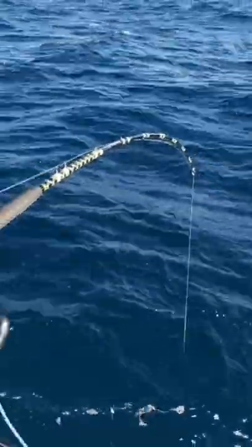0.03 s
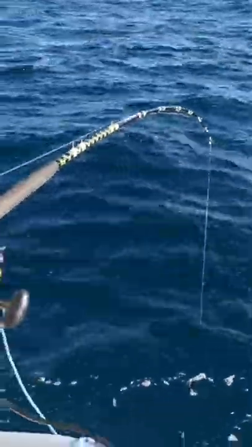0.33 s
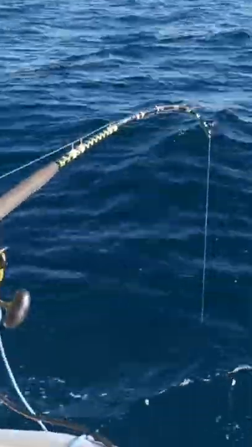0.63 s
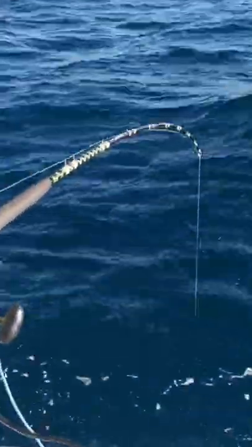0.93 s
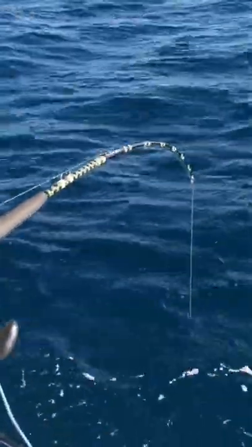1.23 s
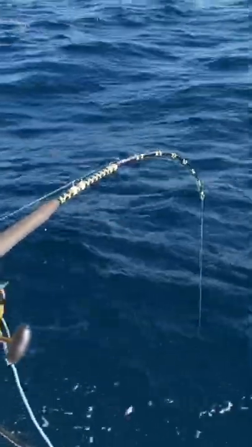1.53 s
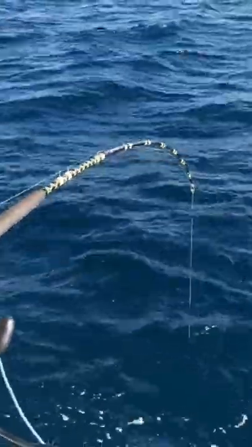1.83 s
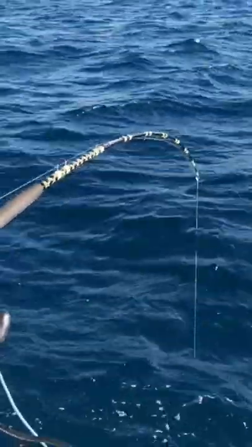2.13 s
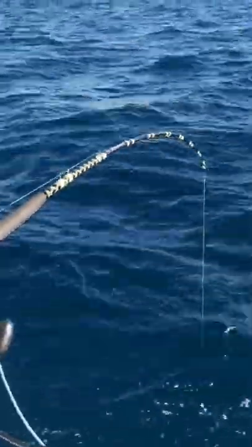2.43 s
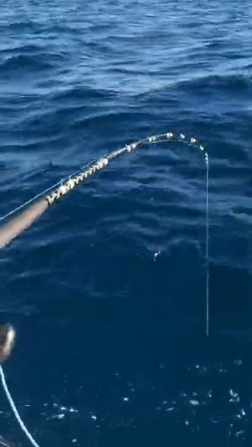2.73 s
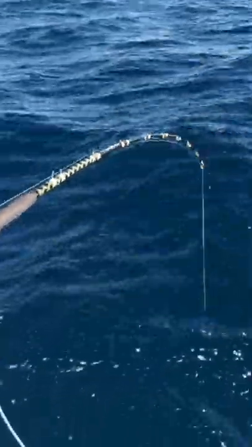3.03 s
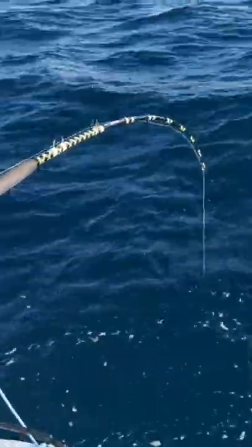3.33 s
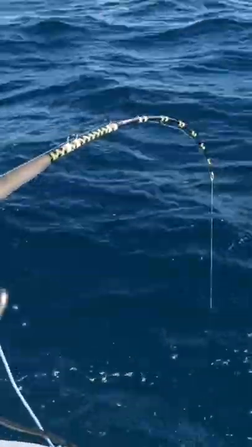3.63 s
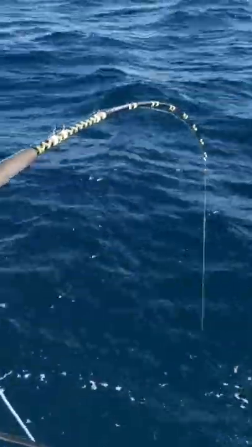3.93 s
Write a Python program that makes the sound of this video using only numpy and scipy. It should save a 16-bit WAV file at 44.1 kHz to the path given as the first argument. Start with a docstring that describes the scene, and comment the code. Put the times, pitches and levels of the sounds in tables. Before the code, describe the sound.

Close, wavering gear whine of an electric fishing reel, with wind gusts over faint sea wash.

```python
"""On a boat at sea, an electric fishing reel winds in line close to the microphone.
Meshing teeth make its gears whine, and sliding teeth rasp through the resonant housing;
the pitch sinks as the gears slow each time the swell loads the rod.
Gusts of wind buffet the microphone with turbulent pressure, mostly on the left,
over a faint wash of water."""
import sys
import numpy as np
from scipy import signal
from scipy.fft import rfft, irfft
from scipy.io import wavfile
from scipy.ndimage import uniform_filter1d, minimum_filter1d

SR = 44100
rng = np.random.default_rng(int(sys.argv[2]) if len(sys.argv) > 2 else 0)


def generate_wav(signal):
    """Clip the signal to [-1, 1] and save it as 16-bit WAV at the path in sys.argv[1]."""
    frames = np.transpose(np.atleast_2d(signal))
    scaled = np.clip(frames, -1, 1) * 32767
    pcm = np.round(scaled).astype(np.int16)
    wavfile.write(sys.argv[1], SR, pcm)


N = 176400
TIME = np.arange(N) / SR
BIN_HZ = np.maximum(np.arange(N // 2 + 1) * SR / N, 1)


def from_db(db):
    """Amplitude grows tenfold for every 20 decibels."""
    return 10 ** (np.asarray(db) / 20)


def unit_rms(x):
    """Normalisation to a mean power of 1."""
    return x / np.sqrt(np.mean(x ** 2) + 1e-20)


def in_time(rows):
    """Linear interpolation of (time_s, value) rows at every sample."""
    return np.interp(TIME, *np.transpose(rows))


def glide(rows):
    """Cubic Hermite interpolation of (time_s, value) rows: the slope stays continuous."""
    times, values = np.transpose(rows)
    slope = np.gradient(values, times)
    i = np.clip(np.searchsorted(times, TIME) - 1, 0, len(times) - 2)
    span, rise = times[i + 1] - times[i], values[i + 1] - values[i]
    u = (TIME - times[i]) / span
    bend = (1 - u) * (slope[i] * span - rise) - u * (slope[i + 1] * span - rise)
    return values[i] + u * rise + u * (1 - u) * bend


def per_bin(rows, column=1):
    """Interpolation of one column of a spectrum over log frequency."""
    columns = np.transpose(rows)
    return np.interp(np.log(BIN_HZ), np.log(columns[0]), columns[column])


def drift(corner_hz, step=20):
    """Low-pass filtered noise: a slow random fluctuation of rms 1."""
    count = N // step
    lowpass = 1 / (1 + (BIN_HZ[:count // 2 + 1] / corner_hz) ** 2)
    slow = irfft(rfft(rng.standard_normal(count)) * lowpass, count)
    return np.interp(np.arange(N) / step, np.arange(count), unit_rms(slow))


def pan(balance_db):
    """Constant-power panning: left and right gains from their level difference."""
    gains = from_db(np.array([balance_db, -balance_db]) / 2)
    return gains / np.sqrt(np.mean(gains ** 2, axis=0))


def stereo_noise(gain_db):
    """Spectral shaping of two uncorrelated white noises."""
    return irfft(rfft(rng.standard_normal((2, N))) * from_db(gain_db), N)


# Spectrum of the water: frequency_hz, relative_db
SEA_SPECTRUM = [(60, -5.5), (200, -7), (500, -18), (1200, -3), (4000, -21), (15000, -52)]


def sea(level_db=-54.5):
    """Stationary noise, uncorrelated between the channels, gives an even wash of water."""
    return from_db(level_db) * unit_rms(stereo_noise(per_bin(SEA_SPECTRUM)))


# Stereo image of the wind: frequency_hz, left_minus_right_db, coherence
WIND_IMAGE = [(30, -1.5, .65), (70, -.5, .55), (160, 5.5, .38), (320, 11.5, .3), (700, 13, .3)]


def turbulence(spectrum, flutter_db, flutter_hz):
    """Turbulent pressure is only partly coherent at two microphones; their average has rms 1."""
    balance_db, coherence = per_bin(WIND_IMAGE), per_bin(WIND_IMAGE, column=2)
    noise = rng.standard_normal((2, N))
    flutter = from_db(flutter_db * np.clip(drift(flutter_hz), -2, 2))
    mid, side = rfft(noise * flutter)
    ports = np.sqrt(1 + coherence) * mid + np.sqrt(1 - coherence) * side * [[1], [-1]]
    pressure = irfft(ports * pan(balance_db) * from_db(per_bin(spectrum)), N)
    return pressure / pressure.mean(axis=0).std()


# Envelopes of the deep rumble and the higher buffeting: time_s, level_db
RUMBLE_ENVELOPE = [(0.0, -29), (0.11, -23), (0.3, -38), (0.32, -31), (0.4, -22), (0.71, -30.5),
                   (0.82, -22.5), (1.02, -23.5), (1.07, -35), (1.14, -28.5), (1.18, -22), (1.34, -28.5),
                   (1.41, -14.5), (1.61, -26.5), (1.67, -20.5), (1.74, -14.5), (1.79, -21), (1.99, -17),
                   (2.02, -20), (2.33, -23), (2.42, -13.5), (2.51, -19.5), (2.6, -11.5), (2.62, -18.5),
                   (2.81, -18.5), (2.84, -18), (3.09, -15.5), (3.13, -21.5), (3.16, -12), (3.23, -17.5),
                   (3.32, -15.5), (3.56, -28.5), (3.6, -18), (3.62, -31), (3.78, -21.5), (3.81, -25.5),
                   (3.98, -22), (4.0, -29)]
BUFFET_ENVELOPE = [(0.0, -36.5), (0.07, -55), (0.09, -24.5), (0.1, -39.5), (0.31, -47.5), (0.47, -26.5),
                   (0.53, -39), (0.61, -31), (0.7, -49), (0.71, -30), (0.81, -44), (0.87, -25), (0.91, -40),
                   (0.93, -26), (1.01, -26.5), (1.05, -42), (1.11, -51), (1.18, -28), (1.21, -56),
                   (1.25, -28), (1.29, -35), (1.31, -45.5), (1.45, -19.5), (1.53, -39), (1.54, -31),
                   (1.67, -28), (1.7, -52), (1.71, -32), (1.77, -28.5), (1.82, -30.5), (1.86, -20),
                   (1.93, -21.5), (1.98, -32), (2.17, -24), (2.19, -41), (2.24, -26), (2.29, -33),
                   (2.37, -28), (2.48, -28.5), (2.61, -24), (2.63, -27), (2.65, -21), (2.83, -29),
                   (2.9, -24.5), (3.1, -25.5), (3.16, -22.5), (3.21, -28.5), (3.41, -27), (3.44, -40),
                   (3.49, -25), (3.63, -46.5), (3.69, -24.5), (3.73, -40.5), (3.83, -43.5), (3.89, -26),
                   (3.92, -38), (3.98, -25), (4.0, -40)]
# Their spectra: frequency_hz, relative_db
RUMBLE_SPECTRUM = [(12, -4), (25, -4.5), (55, -1), (80, -1), (120, -4.5), (200, -11), (350, -24),
                   (800, -90)]
BUFFET_SPECTRUM = [(80, -17), (160, 1), (240, 0.5), (400, -4.5), (600, -10.5), (900, -19.5), (1400, -30.5),
                   (3000, -62)]


def wind(rumble_gain_db=1, buffet_gain_db=1.5):
    """Pressure fluctuations in each gust make a deep rumble and a rougher, higher buffeting."""
    rumble = turbulence(RUMBLE_SPECTRUM, flutter_db=2.5, flutter_hz=15)
    buffet = turbulence(BUFFET_SPECTRUM, flutter_db=3.0, flutter_hz=64)
    return (rumble * from_db(in_time(RUMBLE_ENVELOPE) + rumble_gain_db)
            + buffet * from_db(in_time(BUFFET_ENVELOPE) + buffet_gain_db))


# Single eddies striking the microphone: centre_s, half_width_s, level_db
EDDIES = [(0.464, 0.04, -18.5), (0.841, 0.011, -26), (1.185, 0.022, -18), (1.428, 0.037, -19),
          (1.718, 0.01, -12.5), (1.823, 0.027, -11.5), (1.914, 0.023, -12), (2.173, 0.017, -16),
          (2.607, 0.006, -10), (2.659, 0.025, -15.5), (2.767, 0.021, -13.5), (2.999, 0.018, -14.5),
          (3.374, 0.017, -15.5)]
# Spectrum of an eddy: frequency_hz, relative_db
EDDY_SPECTRUM = [(40, 2.5), (120, 4.5), (300, 0.5), (450, -3.5), (700, -11), (1300, -27), (3000, -54)]


def eddies(gain_db=-3):
    """A passing eddy thumps: a short burst of turbulent pressure under a Gaussian envelope."""
    air = turbulence(EDDY_SPECTRUM, flutter_db=1, flutter_hz=37)
    running_rms = np.sqrt(uniform_filter1d(air.mean(axis=0) ** 2, size=900) + 1e-6)
    envelope = sum(from_db(level_db + gain_db) * np.exp(-2 * ((TIME - centre_s) / half_width_s) ** 2)
                   for centre_s, half_width_s, level_db in EDDIES)
    return air / running_rms * envelope


def throb(turns, depth):
    """Amplitude modulation at twice the shaft's rotation rate."""
    return 1 + depth * np.sin(2 * np.pi * 2 * turns)


def shaft_harmonic(order, turns, roughness, width_hz=71):
    """Uneven tooth contact spreads a shaft harmonic into a narrow band; rms about 1."""
    phase = 2 * np.pi * (round(order) * turns + rng.random())
    in_phase = 1 + roughness * drift(width_hz)
    quadrature = roughness * drift(width_hz)
    return np.sqrt(2) * (in_phase * np.sin(phase) + quadrature * np.cos(phase))


# Rasp that differs between the microphones: frequency_hz, relative_to_shared_hiss_db
INCOHERENT_RASP = [(1000, -7), (2500, -11), (4500, -5), (6000, -9), (8000, -11), (12000, -3)]


def gear_rasp(turns, hiss_db=-16.5, wear_db=-26, wear_points=1024):
    """Sliding friction makes the teeth hiss; their worn pattern repeats on every turn."""
    profile = signal.resample(rng.standard_normal(wear_points), wear_points * 10)
    wear = np.interp(turns % 1, np.arange(len(profile)) / len(profile), profile)
    shared_hiss = from_db(hiss_db) * rng.standard_normal(N)
    incoherent_hiss = stereo_noise(hiss_db + per_bin(INCOHERENT_RASP))
    return (shared_hiss + incoherent_hiss + from_db(wear_db) * wear) * throb(turns, depth=0.04)


# Fainter shaft harmonics, ahead of the resonances: cycles_per_turn, level_db
GEAR_HARMONICS = [(19, -29), (31, -25.5), (60, -37), (62, -33), (64, -38.5), (84, -38.5), (88, -45),
                  (91, -44.5), (95, -37), (108, -44), (115, -42), (117, -37.5), (122, -43.5), (126, -37.5),
                  (157, -39), (187, -44.5), (217, -39.5), (232, -36.5)]
# Resonances of the gear train: centre_hz, bandwidth_hz, gain_db
GEAR_RESONANCES = [(682, 21, 4), (1119, 25, 7.5), (1790, 110, 1), (2210, 155, 7), (2960, 150, -2.5),
                   (3340, 310, 4), (3770, 150, -0.5), (4510, 120, 5), (5440, 260, 5), (6300, 180, 1.5),
                   (7360, 830, 4.5)]
# Level of these tones against the rasp: time_s, gain_db
TONE_ENVELOPE = [(0, 3), (.6, -1.5), (1.2, 0.5), (1.8, 0.5), (2.4, 0), (3.1, 1.5), (4, -1)]


def gear_tones(turns, flutter_db=2.5, flutter_hz=5.3):
    """Forced vibration: faint harmonics change level as they sweep through the gear train's modes."""
    tones = 0
    for order, level_db in GEAR_HARMONICS:
        tone = shaft_harmonic(order, turns, roughness=0.32)
        tones += tone * from_db(level_db + flutter_db * drift(flutter_hz))
    response_db = sum(gain_db / (1 + (2 * (BIN_HZ - centre_hz) / bandwidth_hz) ** 2)
                      for centre_hz, bandwidth_hz, gain_db in GEAR_RESONANCES)
    resonant = irfft(rfft(tones) * from_db(response_db), N)
    return resonant * from_db(in_time(TONE_ENVELOPE)) * throb(turns, depth=0.2)


# Envelopes of the leading whines, named by approximate cycles per turn: time_s, level_db
WHINE_57 = [(0.0, -42.0), (0.18, -37), (0.5, -43), (0.78, -38), (1.24, -47.5), (1.3, -40.5), (1.66, -46),
            (1.78, -52), (1.94, -43.5), (2.2, -51), (2.24, -45), (2.32, -46), (2.38, -44.5), (2.76, -47),
            (3.26, -35.5), (3.46, -48), (3.74, -37.5), (3.98, -38.0)]
WHINE_93 = [(0, -34), (.45, -31), (.62, -30), (.78, -35), (.95, -29), (1.28, -31.5), (1.64, -37.5),
            (2.1, -35.5), (2.3, -37.5), (2.48, -42), (2.63, -43), (2.76, -30.5), (3.02, -48), (3.2, -33.5),
            (3.34, -42), (3.48, -37), (3.64, -36.5), (3.76, -53), (4, -49)]
WHINE_124 = [(0.0, -44), (0.18, -37), (0.3, -45), (0.46, -39), (0.62, -40), (0.78, -36.0), (1.16, -36.0),
             (1.3, -43), (1.86, -32.0), (2.14, -38.5), (2.42, -34.5), (2.66, -41.5), (2.92, -38.5),
             (3.24, -46.0), (3.36, -35), (3.56, -44), (3.62, -37), (3.98, -43)]
WHINE_155 = [(0.0, -50), (0.3, -52), (0.38, -54.0), (0.44, -43), (0.74, -29.5), (1.28, -32.5),
             (1.46, -45.0), (1.62, -40), (1.8, -47), (2.12, -35), (2.24, -50), (2.74, -35), (3.16, -31),
             (3.34, -47.0), (3.54, -39.0), (3.7, -39), (3.84, -58.0), (3.98, -44.0)]
WHINE_174 = [(0, -38), (.1, -33.5), (.54, -30.5), (.74, -47), (1.02, -41), (1.2, -46), (1.34, -33),
             (1.68, -30), (1.84, -34), (1.94, -44), (2.18, -45), (2.4, -34), (2.66, -39), (2.76, -50),
             (3.22, -44), (3.3, -33), (3.62, -45), (4, -46)]
# The leading whines: approximate_cycles_per_turn, envelope, wobble_depth, throb_depth, roughness
LEADING_WHINES = [(93.02, WHINE_93, 0.24, 0.11, 0.23), (123.6, WHINE_124, .05, 0.24, 0.21),
                  (154.8, WHINE_155, 0.18, .4, 0.23), (57, WHINE_57, 0.16, 0.074, 0.28),
                  (174.6, WHINE_174, 0.22, .02, 0.34)]


def whines(turns, gain_db=1, flutter_db=0.7, flutter_hz=5.3):
    """Modulation once and twice a turn puts sidebands on five strong harmonics that swell and fade."""
    out = 0
    for order, envelope, wobble_depth, throb_depth, roughness in LEADING_WHINES:
        level_db = in_time(envelope) + gain_db + flutter_db * drift(flutter_hz)
        modulation = throb(turns, throb_depth) + wobble_depth * np.cos(2 * np.pi * turns)
        out += from_db(level_db) * modulation * shaft_harmonic(order, turns, roughness)
    return out


# Level difference of the reel at the microphones: frequency_hz, left_minus_right_db
LEVEL_DIFFERENCE = [(600, -0.5), (1100, 0), (1600, 6), (1950, -2), (2300, 4), (3100, 2), (3750, 4.5),
                    (4900, 8), (5500, 0), (6200, -1.5), (7000, -1), (8000, -1.5), (14000, 2.5)]
# Phase difference of its direct sound: frequency_hz, left_lead_rad
PHASE_DIFFERENCE = [(300, 0), (1200, .24), (2000, 1), (2670, -.71), (3100, 0), (4400, .86), (4700, .65),
                    (5000, -1.06), (5600, -.65), (6500, -.1), (9000, .1), (14000, -.6)]


def path_to_microphones(scatter_db=-29, decay_s=0.0067):
    """Superposition of direct sound and scatter off the deck gives each side's frequency response."""
    direct = np.exp(np.outer([1j, -1j], per_bin(PHASE_DIFFERENCE) / 2))
    reflections = rng.standard_normal((2, N)) * np.exp(-TIME / decay_s)
    scatter = from_db(scatter_db) * rfft(unit_rms(reflections)) / np.sqrt(N)
    return pan(per_bin(LEVEL_DIFFERENCE)) * (direct + scatter)


# Rate at which the teeth meet, falling under load: time_s, pitch_hz
MESH_RATE = [(0, 1040), (.1, 1023), (.22, 1034), (.38, 1028), (.47, 1036), (.6, 1067), (.75, 1096),
             (.9, 1115), (1.05, 1114), (1.2, 1096), (1.35, 1058), (1.5, 1008), (1.65, 966), (1.8, 943),
             (1.95, 927), (2.08, 920), (2.3, 937), (2.45, 969), (2.6, 1020), (2.72, 1070), (2.87, 1112),
             (3.02, 1127), (3.15, 1111), (3.25, 1066), (3.35, 996), (3.45, 950), (3.6, 902), (3.72, 872),
             (3.85, 859), (4, 875)]
# Envelope of the rasp and fainter tones, taken about its mean: time_s, level_db
GEAR_ENVELOPE = [(0.0, -18), (0.53, -17), (1.15, -17.5), (2.26, -20), (2.56, -20), (2.61, -21.5),
                 (2.74, -22), (3.29, -19.5), (3.98, -18), (4.0, -16)]
# Frequency response of the housing: frequency_hz, gain_db
HOUSING_RESPONSE = [(200, -18.5), (600, -25.5), (1100, -26), (1420, -19.5), (1600, -15), (1740, -15.5),
                    (1900, -13), (2100, -19.5), (2250, -14), (2450, -10.5), (2780, -8), (2920, -5.5),
                    (3100, -8.5), (3310, -6), (3420, -11), (3780, -3), (4230, -11), (4520, -5.5),
                    (4850, -5), (5350, -1.5), (5750, 0.5), (6200, -9), (6500, -6.5), (6900, -13.5),
                    (7600, -9), (8000, -14.5), (8350, -20.5), (9400, -28), (10000, -42), (11800, -33),
                    (15000, -41.5)]


def reel(teeth=31, speed_jitter=0.001222, jitter_hz=13.7):
    """Source and filter: the housing colours the rasp and faint tones; the leading whines add on top."""
    mesh_hz = glide(MESH_RATE) * (1 + speed_jitter * drift(jitter_hz))
    turns = np.cumsum(mesh_hz) / teeth / SR
    level_db = in_time(GEAR_ENVELOPE)
    gears = (gear_tones(turns) + gear_rasp(turns)) * from_db(level_db - level_db.mean())
    radiated = rfft(gears) * from_db(per_bin(HOUSING_RESPONSE)) + rfft(whines(turns))
    return irfft(radiated * path_to_microphones(), N)


def scene():
    """Linear superposition: the pressures of water, wind and reel add."""
    return sea() + wind() + eddies() + reel()


def record(dry, ceiling=0.84, smoothing_s=0.006, cutoff_hz=15100):
    """Peak limiting holds the strongest gusts; an elliptic low-pass cuts the top steeply."""
    window = int(smoothing_s * SR)
    gain = np.minimum(1, ceiling / (np.abs(dry).max(axis=0) + 1e-9))
    smooth_gain = uniform_filter1d(minimum_filter1d(gain, 2 * window), window)
    lowpass = signal.ellip(10, .1, 80, cutoff_hz, fs=SR, output="sos")
    return signal.sosfilt(lowpass, dry * smooth_gain)


dry = scene()
out = record(dry)
generate_wav(out)
```